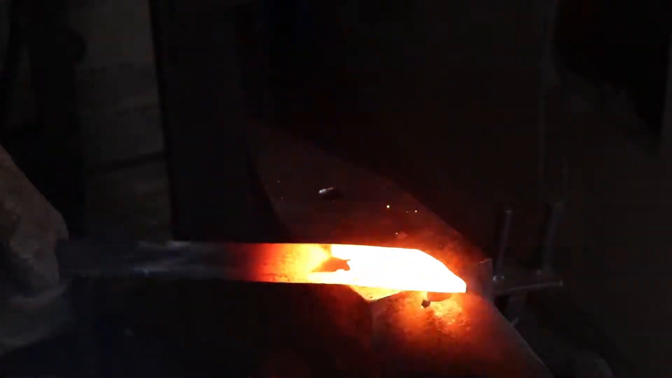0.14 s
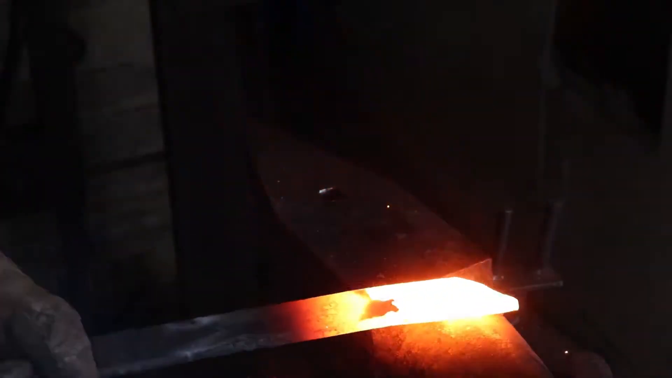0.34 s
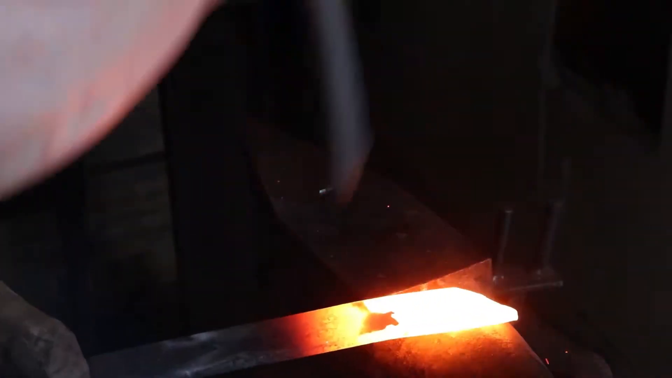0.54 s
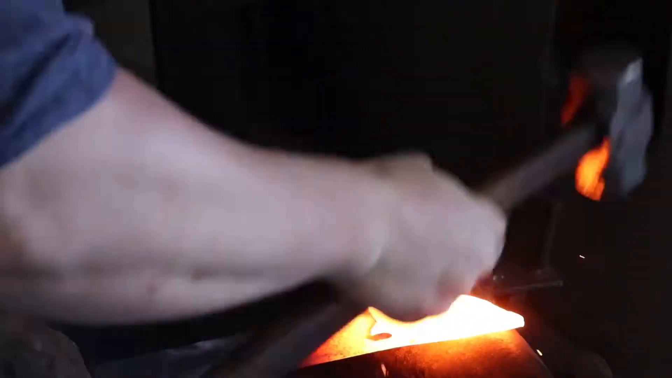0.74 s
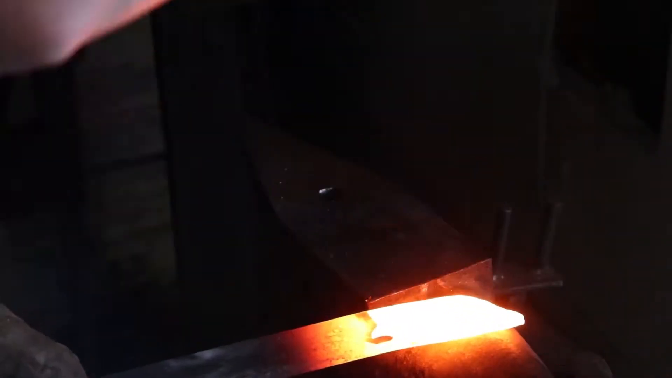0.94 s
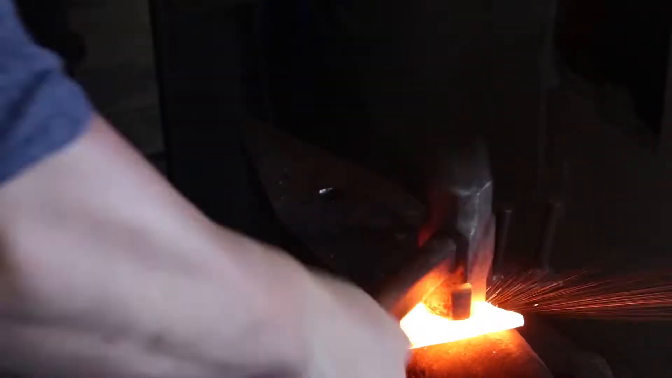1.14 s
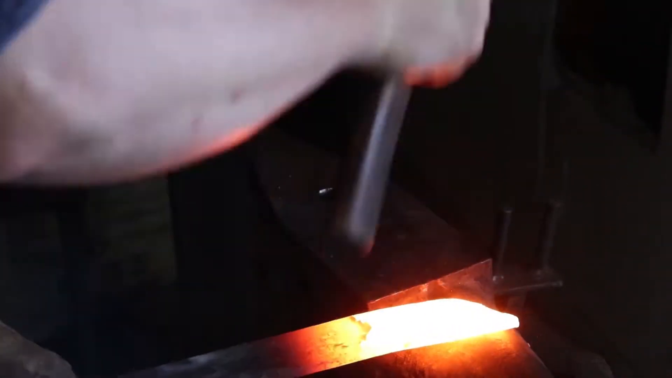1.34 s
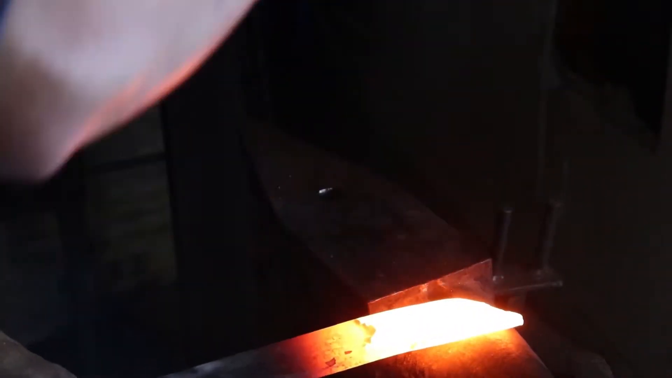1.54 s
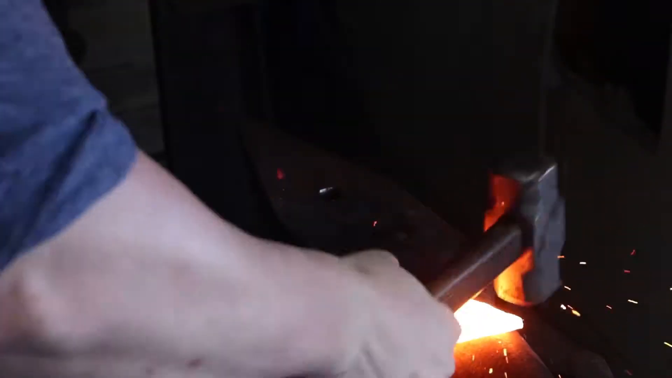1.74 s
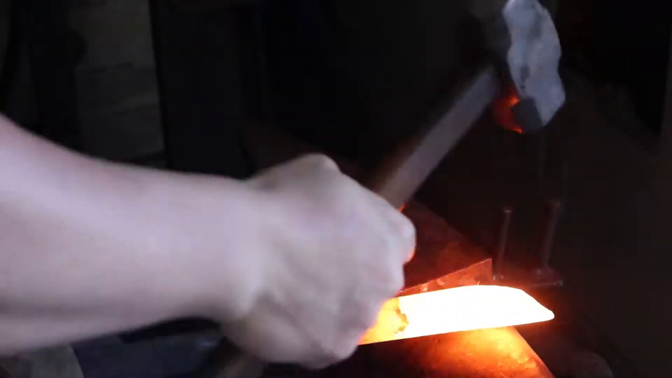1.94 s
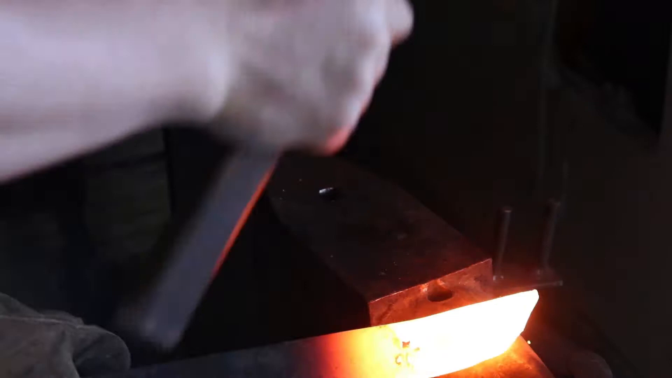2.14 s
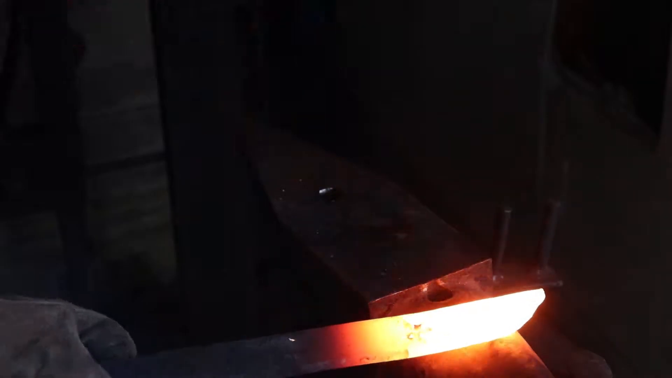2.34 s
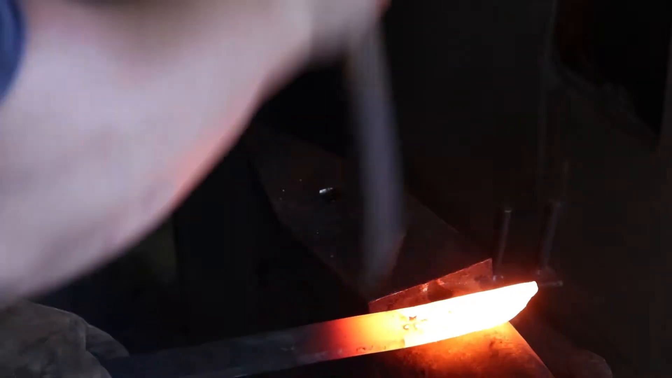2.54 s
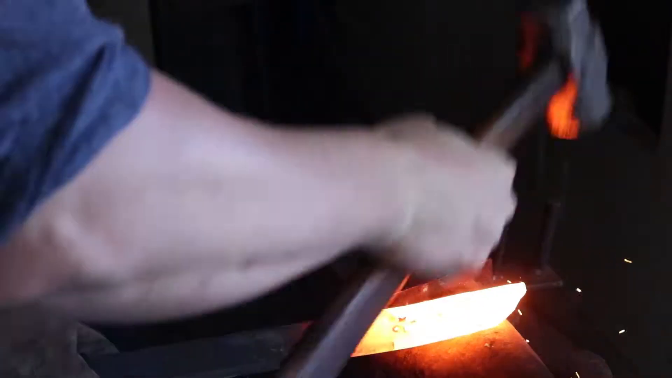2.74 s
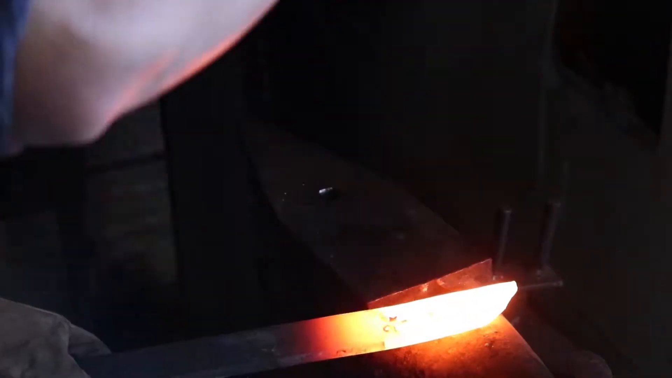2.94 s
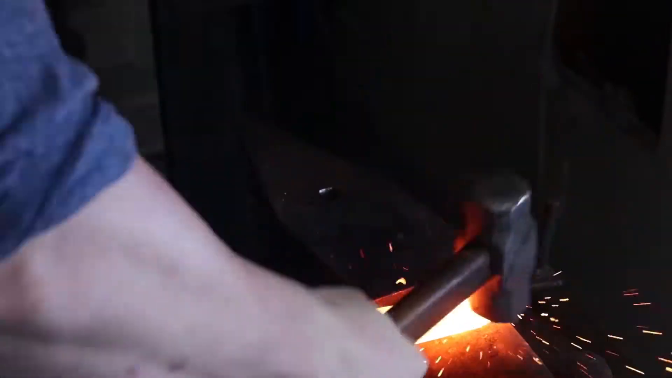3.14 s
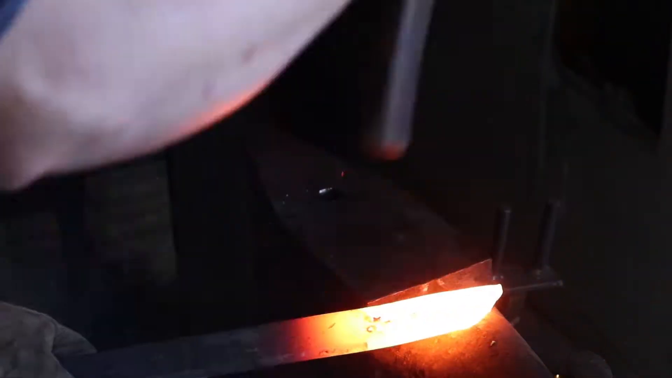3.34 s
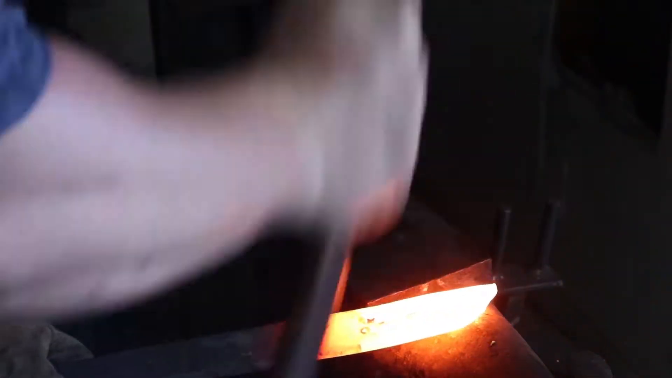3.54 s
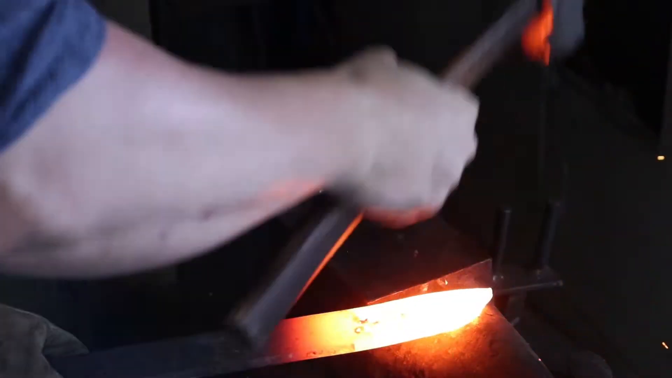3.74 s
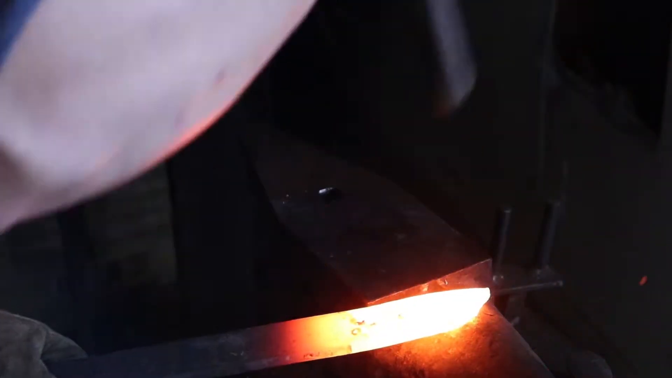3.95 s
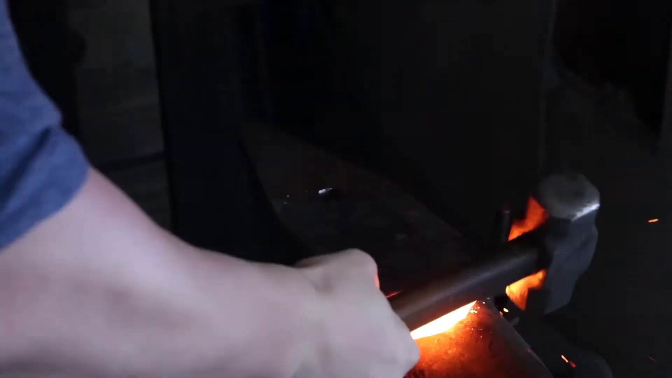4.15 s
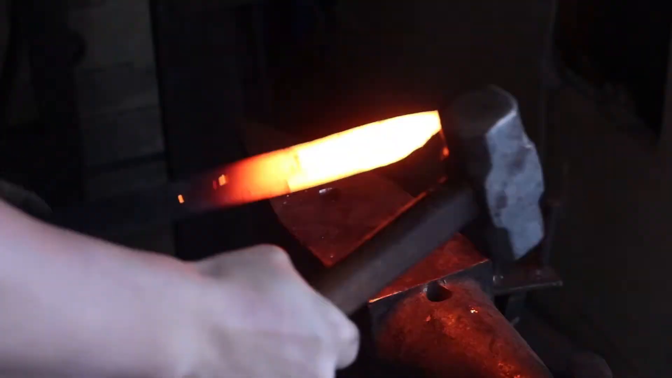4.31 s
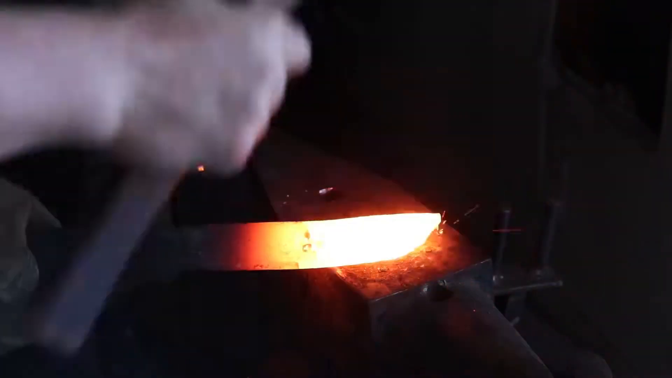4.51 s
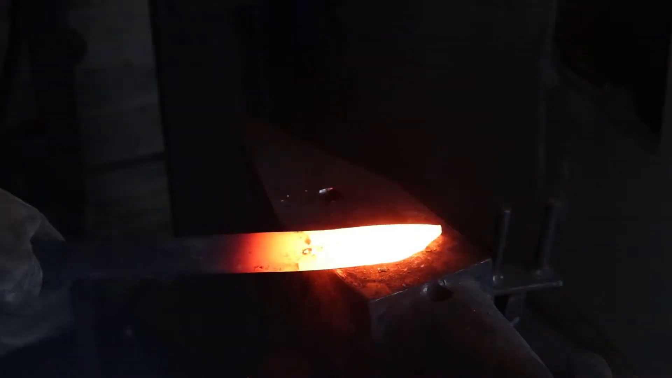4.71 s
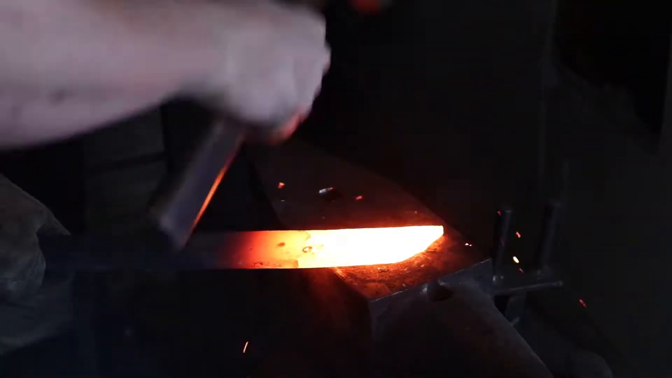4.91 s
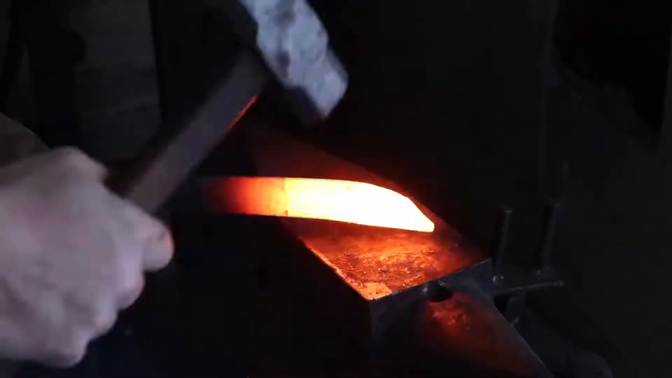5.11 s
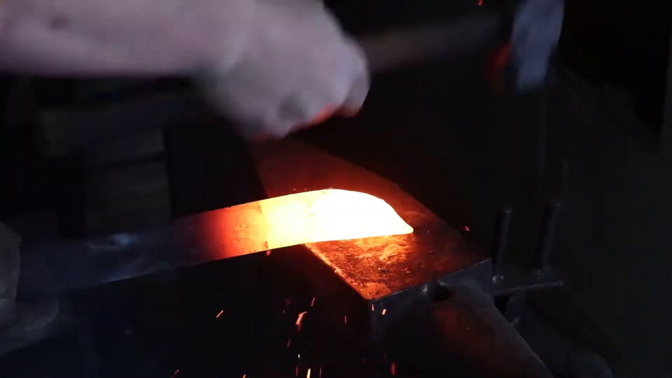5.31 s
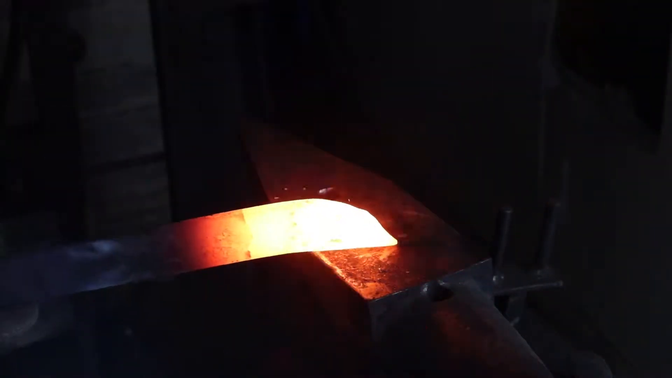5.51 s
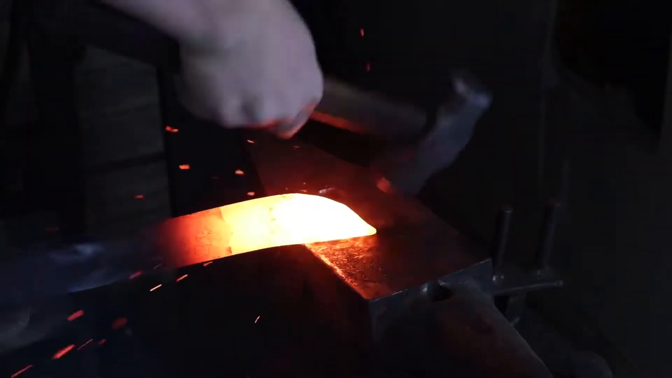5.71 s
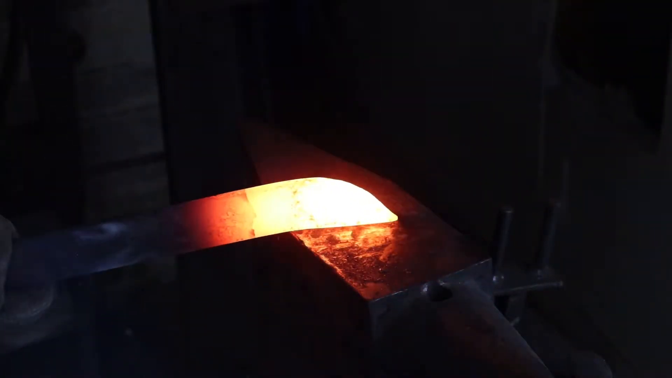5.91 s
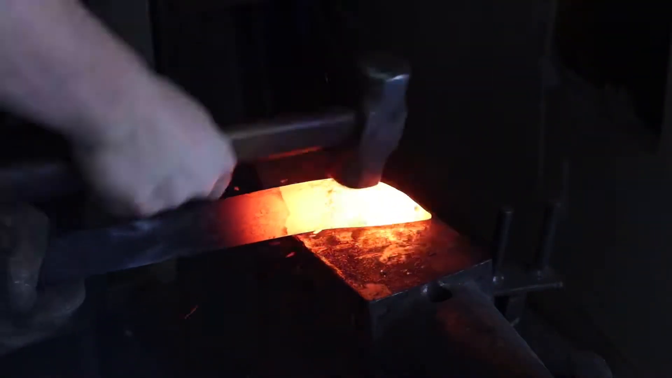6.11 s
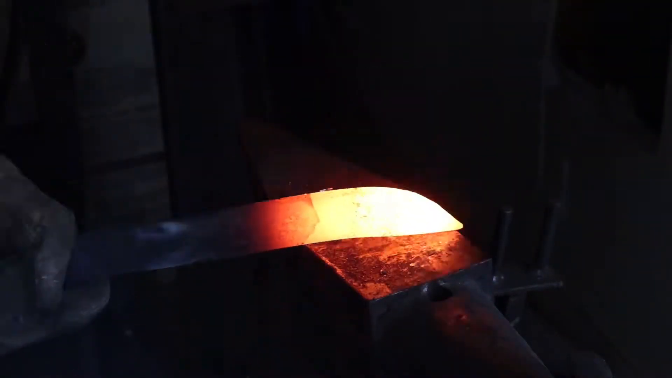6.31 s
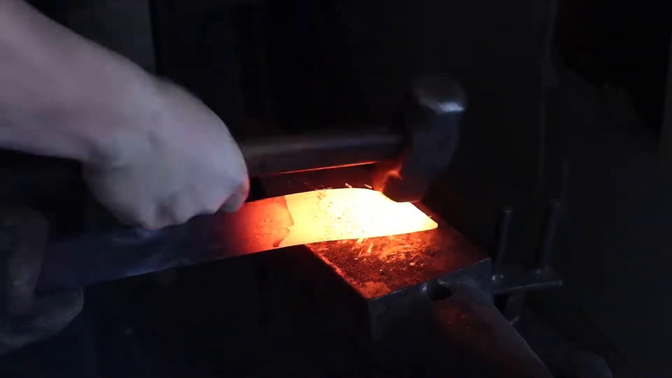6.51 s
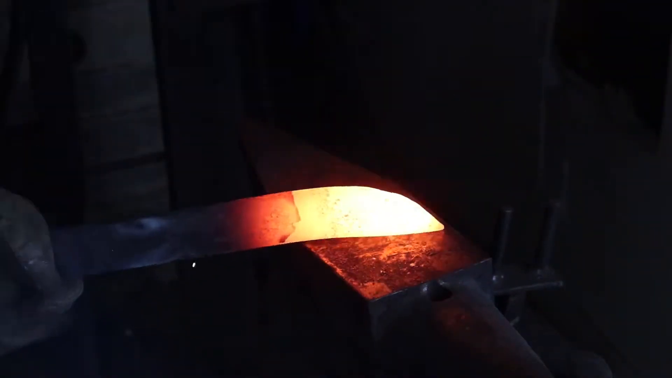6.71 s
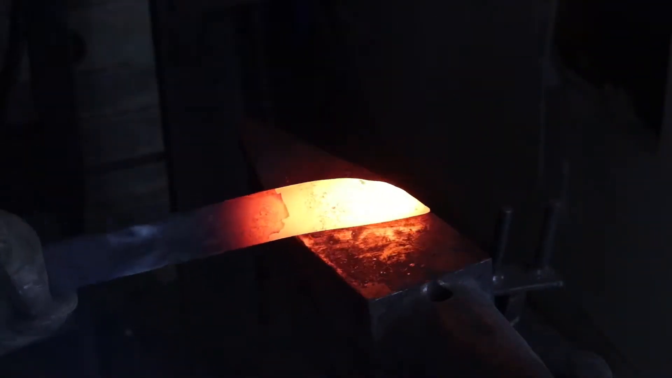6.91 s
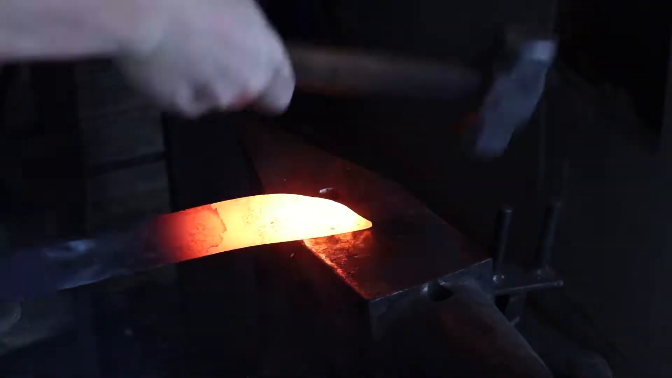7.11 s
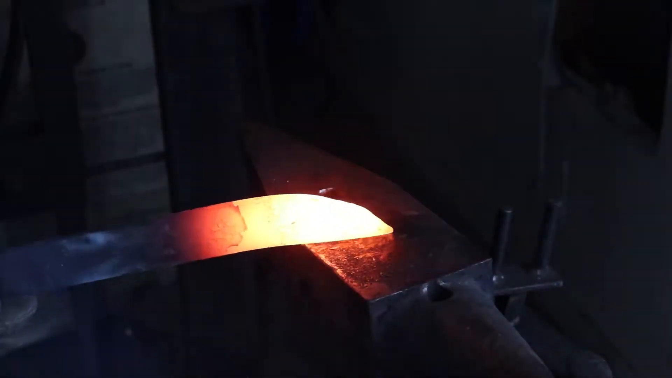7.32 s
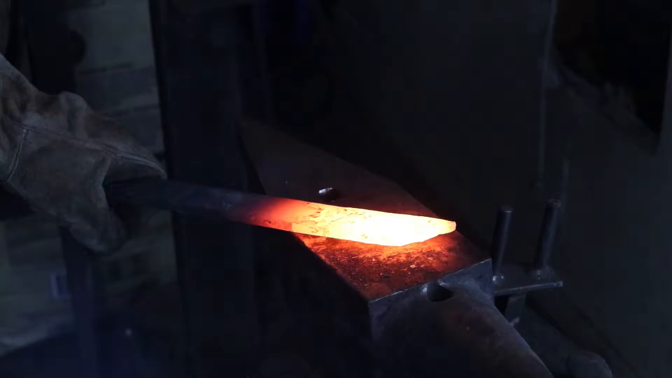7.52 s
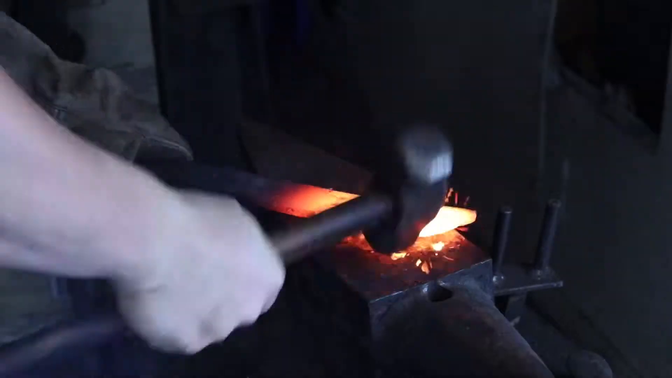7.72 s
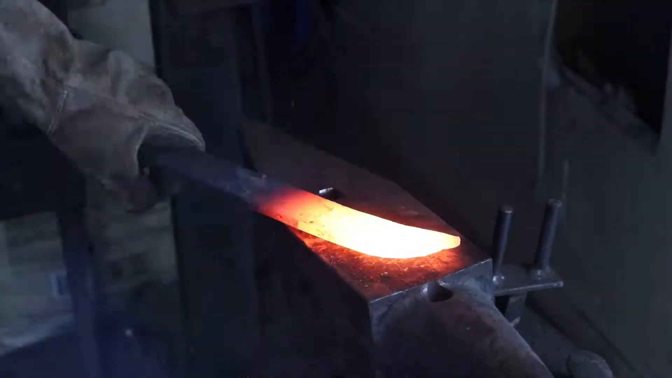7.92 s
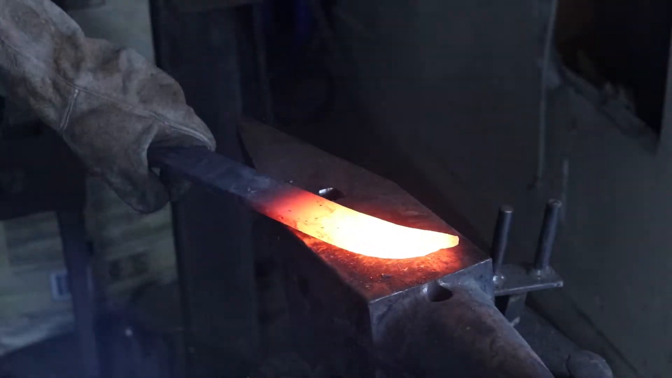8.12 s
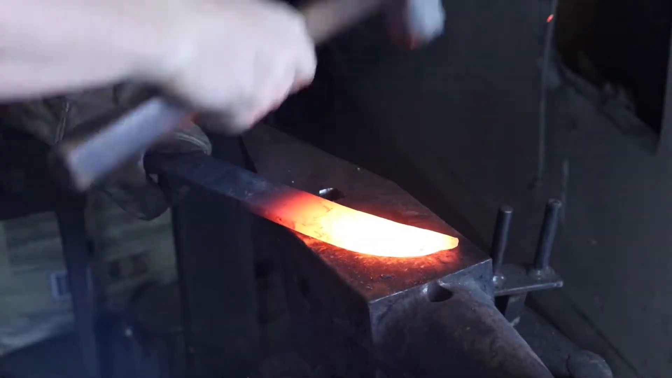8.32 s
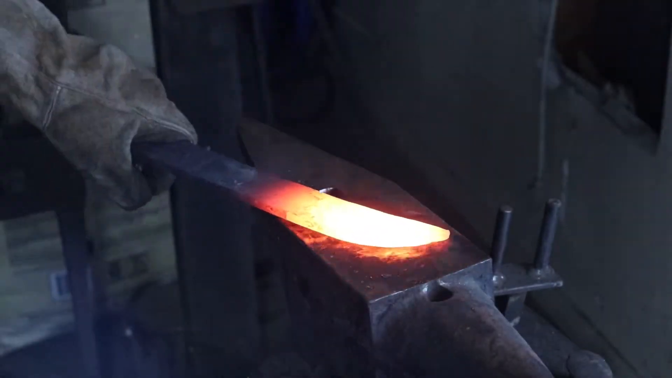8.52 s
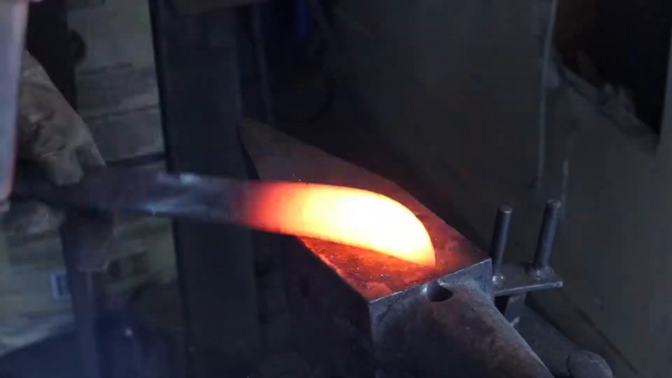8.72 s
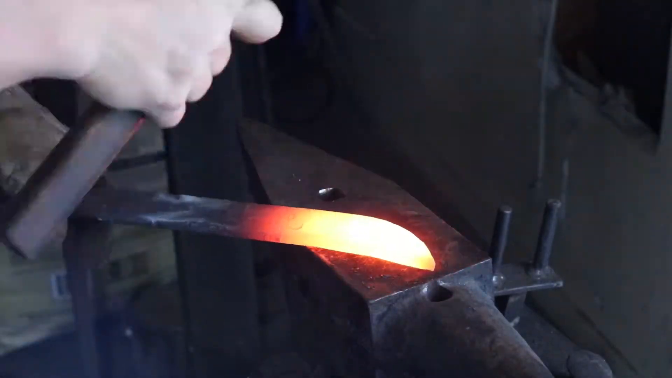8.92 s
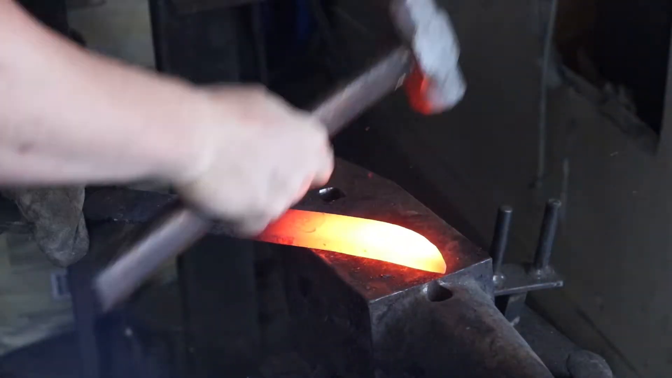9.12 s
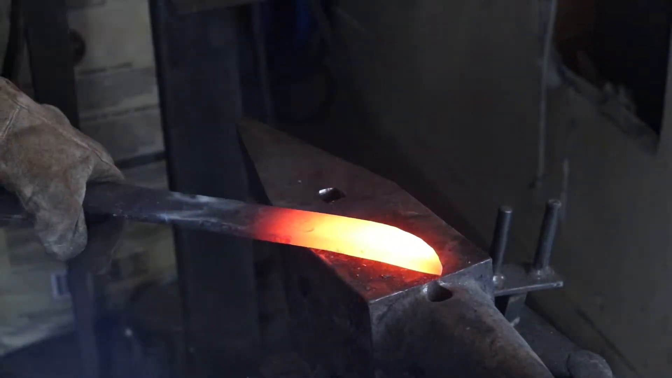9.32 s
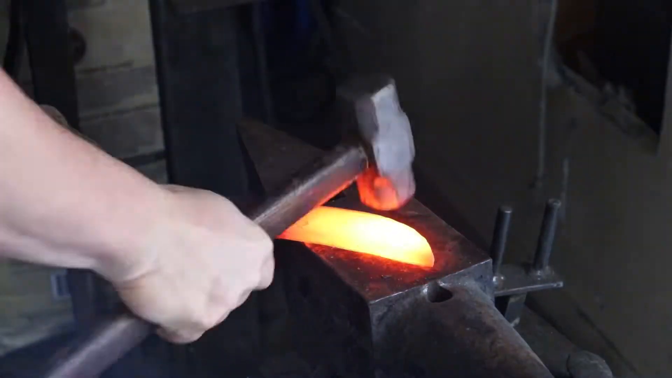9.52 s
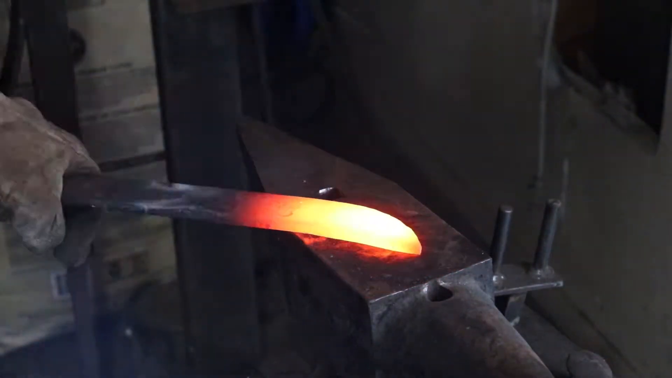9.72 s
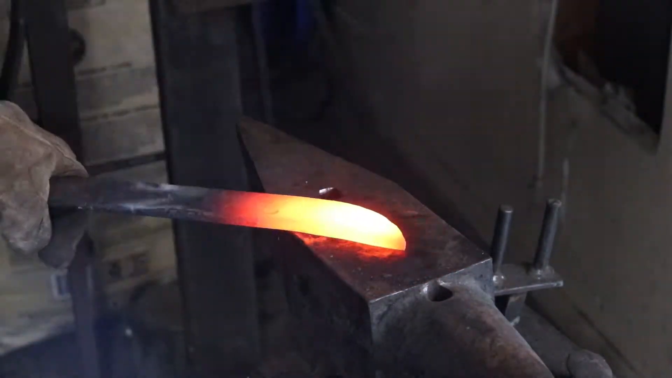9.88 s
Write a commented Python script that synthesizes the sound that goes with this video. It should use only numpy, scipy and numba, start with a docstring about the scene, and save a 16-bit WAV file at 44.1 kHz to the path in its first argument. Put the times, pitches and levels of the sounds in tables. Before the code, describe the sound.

A hammer blow is dying away at 0 s over a low, fluttering forge roar with faint blower hum. Bright cold-metal taps come at 0.43 and 0.63 s, then hard blows on hot steel at 0.73, 1.26 and 1.77 s, with a faint double wooden knock near 1.1 s. A ringing, whistling tap sounds at 2.19 s; blows resume at 2.73, 3.22, 3.70 and, strongest, 4.16 s, then a clear tap at 4.61 s. Each blow is a blunt, distorted crack with metallic ring and workshop reverberation, briefly pushing the roar down. From 4.94 s all runs four times faster and two octaves higher: the roar becomes airy hiss, blows short shrill pecks. Two come first, a tap at 5.22 s, then a steady run of about seven per second from 5.36 to 8.65 s, with a tap at 7.55 s. After a gap with taps near 8.8 s, more ringing pecks run from 9.17 s to the end.

```python
"""A hammer blow on hot steel is already dying away over a roaring forge, then more blows and taps follow.
Blows are a noisy crack with anvil and hammer modes, taps a bright bar; the forge is shaped noise with hum.
Every hit excites a reverberant workshop. A late gain control lets loud blows clip, then ducks the sound.
From 4.935 s the action runs four times faster: every time shortens and every pitch rises two octaves."""
import sys
import numpy as np
from scipy import signal
from scipy.fft import rfft, irfft, next_fast_len
from scipy.io import wavfile
from scipy.ndimage import uniform_filter1d
from numba import njit

SR = 44100
rng = np.random.default_rng(int(sys.argv[2]) if len(sys.argv) > 2 else 0)


def pcm_store(signal):
    """Save signal as 16-bit PCM."""
    levels = np.round(np.clip(np.atleast_2d(signal), -1, 1) * 32767)
    wavfile.write(sys.argv[1], SR, levels.astype(np.int16).T)


N = 438794

# Event times are output time; frequencies and decays are workshop time, before the speed-up.
FAST_START_S = 4.935
TOP_HZ = 16000
# workshop time per output time: (normal part [ratio], fast part [ratio])
SPEEDS = (1, 4)

# Forge roar colour: (frequency [Hz], relative density [dB per Hz])
ROAR_COLOUR = [(12, -69), (30, -21), (60, -7.5), (110, -19), (180, -9.5), (290, 0.5), (430, -4.5),
               (625, -2.5), (800, -10), (1200, -19), (2000, -20.5), (4000, -31), (8000, -34), (16000, -48)]
# Roar ahead of the gain control: (normal part [dB rms], fast part [dB rms])
ROAR_LEVELS = (-29.5, -31.5)
# Blower tones ahead of the gain control: (frequency [Hz], level [dB rms])
BLOWER_TONES = [(146, -51), (184, -49), (236, -42.5), (553, -46)]
# Stereo likeness of noise: (frequency [Hz], left-right correlation [-1 to 1])
STEREO_LIKENESS = [(20, .6), (60, .8), (150, 0.88), (300, 0.94), (1000, 0.6), (3000, 0.24), (10000, 0.12)]
# Room decay: (frequency [Hz], t60 [s])
ROOM_DECAY = [(100, .8), (500, 1.0), (1500, .95), (4000, .8), (8000, .6), (16000, .35)]

# Dull wooden knocks: (time [s], strength [dB])
KNOCKS = [(1.099, -16), (1.155, -16)]
# Metal touching the cold anvil:
# (time [s], strength [dB], bar pitch [factor], anvil ring [dB], whistle [dB])
TAPS = [(.4335, -6, 0.8, -24, -21), (.628, -3, 1.12, -7, -17), (1.099, -19, 1.03, -26, -9),
        (2.1867, -4.5, 1, -8, 5.5), (4.6139, 3, 1.001, -28, -3), (5.223, 2.5, 1, -22, -9),
        (7.5465, 1, 0.92, -11, -9), (8.792, 1, 1.2, -24, -9), (8.842, -8, 1.26, -33, -9)]
# Cold bar modes, before pitch and level offset: (frequency [Hz], level [dB], t60 [s])
BAR_MODES = [(963, -15, 0.18), (1634, -9, 0.1), (1820, 2.5, 0.038), (2310, -16, 0.048), (2433, 2, 0.053),
             (3060, 5, .06), (3300, -7, 0.12), (3700, -1.5, 0.12), (4390, -2, 0.2), (5250, -8, .12),
             (5670, -33, 0.062), (6840, -7.5, 0.17), (6670, -34, 0.083)]
BAR_OFFSET_DB = -15
# Contact colour of a tap: (frequency [Hz], relative level [dB])
CLINK_COLOUR = [(200, -34), (700, -16), (1100, -2.5), (1800, -3.5), (3000, -1), (6000, -4.5), (9000, -15.5),
                (16000, -38)]

# Hammer blows on hot steel: (time [s], strength [dB])
BLOWS = [(-.045, -3.5), (.733, -1), (1.255, -3), (1.7667, -3), (2.729, -3), (3.217, -3), (3.7009, -3),
         (4.161, 1), (4.951, -7.5), (5.077, -5.5), (5.357, -6), (5.489, -5.5), (5.6237, -7), (5.7619, -6),
         (5.8989, -3.5), (6.036, -7), (6.1703, -4), (6.309, -3.5), (6.446, -3), (6.584, -3.5),
         (6.7235, -3.5), (6.8688, -5.5), (7.0155, -5.5), (7.1613, -3), (7.309, -4.5), (7.4565, -4),
         (7.6456, -9), (7.7865, -6), (7.9287, -5.5), (8.0747, -4.5), (8.2149, -7), (8.361, -3), (8.505, -5),
         (8.6481, -10), (9.168, -6), (9.307, -5.5), (9.4475, -6), (9.5857, -7), (9.729, -5.5), (9.869, -10)]
# Contact colour of a blow: (frequency [Hz], relative level [dB])
CRACK_COLOUR = [(20, -31), (100, -19), (180, -6), (280, -6), (420, -9), (630, -0.5), (800, -5), (1300, -2),
                (2200, -7), (3000, -9), (5000, -10), (8000, -13.5), (12000, -23.5), (16000, -48)]
# Anvil and hammer modes: (frequency [Hz], level on face [dB], level at edge [dB], t60 [s])
ANVIL_MODES = [(1358, -13, -24, 0.094), (1812, -9.5, -16, 0.061), (2562, 1, -7, 0.14), (2577, -4, 1.5, .16),
               (2617, -9.5, -11, 0.18), (3094, -21, -7, 0.2), (3762, -16, -8, 0.15), (4800, -12, -18, 0.06),
               (6320, -23, -31, 0.2), (6750, -26, -34, .12), (7413, -46, -49, .7), (9400, -61, -46, .8)]
# Hammer-head whistle, before its level offset: (frequency [Hz], level [dB], t60 [s])
WHISTLE_MODES = [(12084, -38, 1.05), (12087, -42, 1.05)]
WHISTLE_OVER_RING_DB = 13.5
# Block under the anvil: (frequency [Hz], level [dB], t60 [s])
BLOCK_MODES = [(237, -6, .05), (630, -3, .05), (1197, -3, .04)]
# Where blows land, 0 face to 1 edge: (normal part [0-1], fast part [0-1])
BLOW_PLACES = (0.12, 0.71)
# Ring passing through the steel into the anvil: (time [s], ring over strength [dB])
RING_THROUGH_STEEL = [(0, -9), (.75, -3), (1.3, 7), (2.7, 0), (3.2, 6), (4.2, 7), (4.95, 4), (5.4, 5.5),
                      (6.4, 0.5), (7.4, 4), (8.4, 11.5), (9.9, 13.5)]


def amp(db):
    """Turns decibels into an amplitude factor."""
    return 10 ** (np.asarray(db) / 20)


def along(points, hz):
    """Reads (frequency [Hz], value) points on a log frequency axis."""
    f, v = np.transpose(points)
    return np.interp(np.log(hz + 1), np.log(f + 1), v)


def cloud(count, rate, level_db, per_s=170):
    """Stereo noise shaped over frequency and time; mid and side shares set how alike the channels are."""
    size = round(rate / per_s)
    hz, t, z = signal.stft(rng.standard_normal((2, count)), rate, nperseg=size)
    likeness = np.clip(along(STEREO_LIKENESS, hz), -1, 1)
    turn = np.arccos(likeness)[:, None] / 2
    z = z * amp(level_db(hz[:, None], t)) * [np.cos(turn), np.sin(turn)]
    mid, side = signal.istft(z, rate, nperseg=size)[1][:, :count]
    return np.array([mid + side, mid - side])


def forge(count, rate, level_db):
    """The blown fire: a roar that flutters in patches, over the faint tones of the blower."""
    def roar_level(hz, t):
        """Smooths random level changes over neighbouring bands and frames, 0.54 dB deep (rms)."""
        field = rng.standard_normal((len(hz), len(t)))
        field = uniform_filter1d(field, size=16, axis=0)
        field = uniform_filter1d(field, size=3, axis=1)
        return along(ROAR_COLOUR, hz) + 0.54 * field / field.std()

    roar = cloud(count, rate, roar_level, per_s=25)
    t = np.arange(count) / rate
    hum = sum(np.sqrt(2) * amp(db) * np.sin(2 * np.pi * hz * t) for hz, db in BLOWER_TONES)
    return amp(level_db) * roar / roar.std() + hum


def in_shop(ringing, contact, colour, rate, wet_db, wash_db):
    """Adds the room's answer to the ring and a diffuse contact wash; each frequency dies at its own speed."""
    count = ringing.shape[1]
    gap = ((0, 0), (round(rate / 500), 0))  # the room answers 2 ms late
    tail = cloud(count, rate, lambda hz, t: -60 * t / along(ROOM_DECAY, hz))
    tail /= np.linalg.norm(tail[0])
    wet = signal.fftconvolve(ringing[:1], tail, axes=1)[:, :count]

    def wash_level(hz, t):
        """Starts with the contact's colour and decays with the room."""
        return along(colour, hz) - 60 * t / along(ROOM_DECAY, hz)

    wash = cloud(count, rate, wash_level, per_s=60)
    wash /= wash[:, :round(rate / 20)].std()  # level set over the first 50 ms
    near = ringing + np.pad(contact, (0, count - len(contact)))
    room = amp(wet_db) * wet + amp(wash_db) * wash
    return near + np.pad(room, gap)[:, :count]


def burst(colour, t60, rate):
    """Contact noise of peak 1: decaying noise through a causal, minimum-phase colour filter."""
    size = 2048
    level_db = along(colour, np.fft.rfftfreq(size, 1 / rate))
    cepstrum = irfft(np.log(amp(level_db)), size)
    # fold the cepstrum forward so the filter has no pre-echo
    cepstrum[1:size // 2] *= 2
    cepstrum[size // 2 + 1:] = 0
    colour_filter = irfft(np.exp(rfft(cepstrum)), size)
    t = np.arange(size) / rate
    noise = rng.standard_normal(size) * amp(-60 * t / t60)
    x = signal.fftconvolve(colour_filter, noise)
    return x / np.abs(x).max()


def ring(modes, rate):
    """Decaying sines with slightly new strengths, each a little out of phase between left and right."""
    x = np.zeros((2, round(rate * .9)))
    sides = np.array([[1], [-1]])
    for (hz, db, t60), (chance, turn) in zip(modes, rng.standard_normal((len(modes), 2))):
        if hz < rate / 2:
            t = np.arange(min(x.shape[1], round(rate * t60))) / rate
            level_db = db + 2 * chance - 60 * t / t60
            x[:, :len(t)] += amp(level_db) * np.sin(2 * np.pi * hz * t + 0.61 * turn * sides)
    return x


def anvil_modes(place, ring_db, whistle_db):
    """Blends face and edge modes by point of contact; two close hammer-head modes beat as a whistle."""
    place = np.clip(place, 0, 1)
    modes = [(hz, face + place * (edge - face) + ring_db, t60) for hz, face, edge, t60 in ANVIL_MODES]
    return modes + [(hz, db + whistle_db, t60) for hz, db, t60 in WHISTLE_MODES]


def knock(rate, s, db):
    """A low wooden knock: two heavily damped modes, heard mostly through the room."""
    x = ring([(471, -3.0, 0.08), (354, -8, 0.037)], rate)
    return amp(db) * in_shop(x, np.zeros(1), CRACK_COLOUR, rate, wet_db=7, wash_db=-43)


def tap(rate, s, db, pitch, anvil_db, whistle_db):
    """Cold metal on cold metal: thin, bright bar modes with some anvil ring and a short clink."""
    bar = [(hz * pitch, level + BAR_OFFSET_DB, t60) for hz, level, t60 in BAR_MODES]
    x = ring(bar + anvil_modes(0.3, anvil_db, whistle_db), rate)
    clink = burst(CLINK_COLOUR, 0.016, rate)
    return amp(db) * in_shop(x, clink, CLINK_COLOUR, rate, wet_db=-6.0, wash_db=-14)


def blow(rate, s, db):
    """Hot steel swallows part of the blow as a thud; anvil and hammer ring according to where it lands."""
    ring_db = np.interp(s, *np.transpose(RING_THROUGH_STEEL))
    place = BLOW_PLACES[s >= FAST_START_S]
    modes = anvil_modes(place, ring_db, whistle_db=ring_db + WHISTLE_OVER_RING_DB)
    x = ring(BLOCK_MODES + modes, rate)
    crack = amp(11.5) * burst(CRACK_COLOUR, .033, rate)
    return amp(db) * in_shop(x, crack, CRACK_COLOUR, rate, wet_db=-2.5, wash_db=0)


def parts():
    """Gives (first sample, end sample, samples per workshop second) at normal and fast speed."""
    switch = round(FAST_START_S * SR)
    return [(0, switch, SR / SPEEDS[0]), (switch, N, SR / SPEEDS[1])]


def scene():
    """Lays the hits over the forge; the fast part holds fewer samples per workshop second."""
    out = []
    for (start, end, rate), forge_db in zip(parts(), ROAR_LEVELS):
        # spare room for a hit that begins early or rings past the end
        x = np.pad(forge(end - start, rate, forge_db), ((0, 0), (SR, 2 * SR)))
        for source, table in ((knock, KNOCKS), (tap, TAPS), (blow, BLOWS)):
            for s, *how in table:
                if (s >= FAST_START_S) == bool(start):
                    sound = source(rate, s, *how)
                    first = round(s * SR) - start + SR
                    x[:, first:][:, :sound.shape[1]] += sound
        out.append(x[:, SR:SR + end - start])
    return np.concatenate(out, axis=1)


@njit
def glide(wanted, down, up):
    """Follows a gain curve, fast downwards and slower upwards."""
    out, now = np.empty_like(wanted), wanted[0]
    for i in range(len(wanted)):
        now += (wanted[i] - now) * (down if wanted[i] < now else up)
        out[i] = now
    return out


def gain_control(x, rate):
    """Turns down most of what exceeds the hold level, but reacts late, so loud onsets clip first."""
    hold_db, share = -20.5, .86  # share of the excess dB removed
    late_s, window_s, attack_s, release_s = .017, .004, .009, .045
    width = round(window_s * rate)
    power = np.abs(uniform_filter1d(np.mean(x ** 2, axis=0), width))
    delay = round(late_s * rate) + width // 2
    power = np.pad(power, (delay, 0), mode="edge")[:x.shape[1]]
    excess_db = np.maximum(10 * np.log10(power + 1e-12) - hold_db, 0)
    gain_db = glide(-share * excess_db, 1 / (attack_s * rate), 1 / (release_s * rate))
    x = x * amp(gain_db)
    return x / (1 + np.abs(x) ** 12) ** (1 / 12)  # rounded clipping near full scale


def record(dry):
    """Applies gain control and clipping in workshop time, then removes all above the band limit."""
    x = np.concatenate([gain_control(dry[:, start:end], rate) for start, end, rate in parts()], axis=1)
    m = next_fast_len(N + SR // 2)
    in_band = np.fft.rfftfreq(m, 1 / SR) < TOP_HZ
    x = irfft(rfft(x, m) * in_band, m)[:, :N]
    return np.clip(x, -1, 1)


dry = scene()
out = record(dry)
pcm_store(out)
```